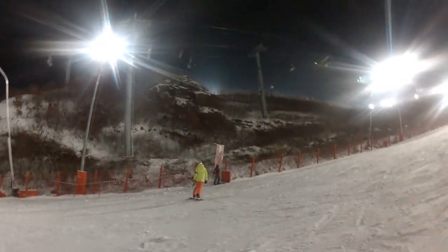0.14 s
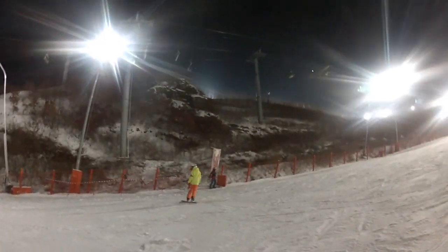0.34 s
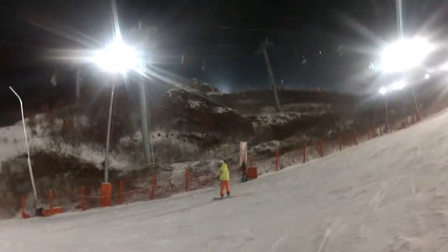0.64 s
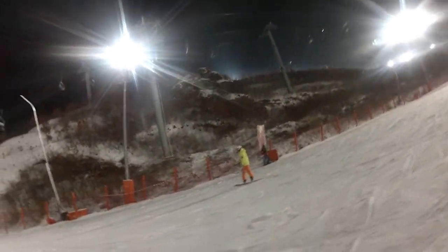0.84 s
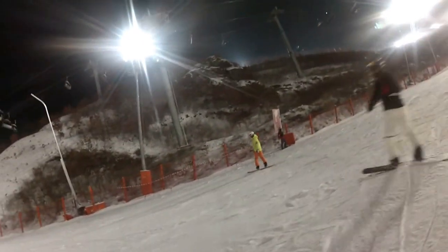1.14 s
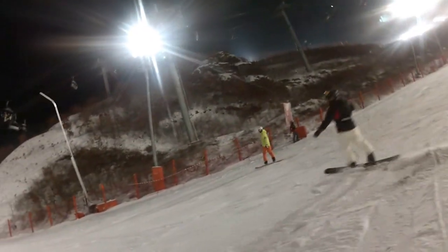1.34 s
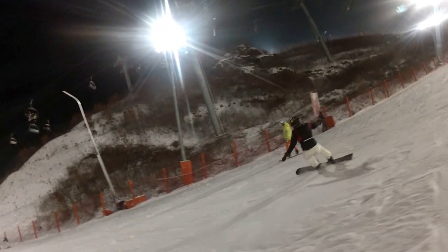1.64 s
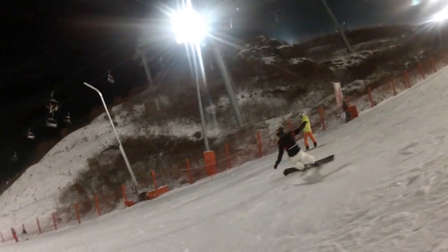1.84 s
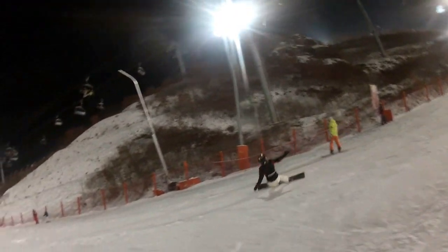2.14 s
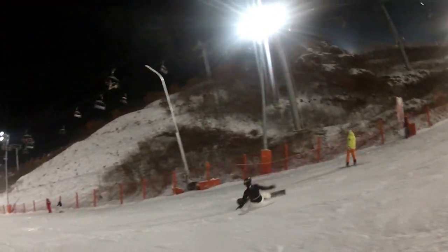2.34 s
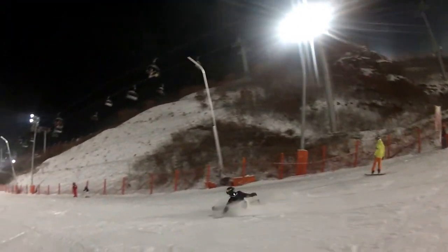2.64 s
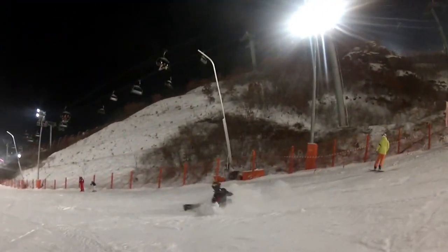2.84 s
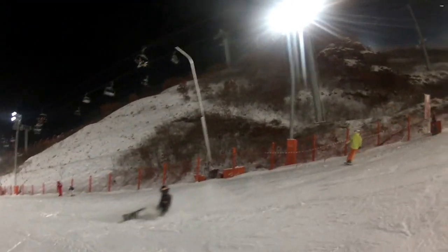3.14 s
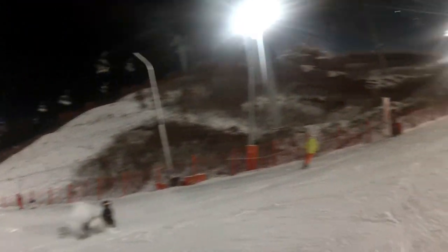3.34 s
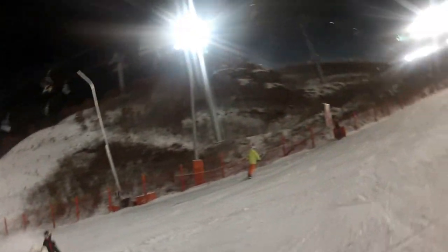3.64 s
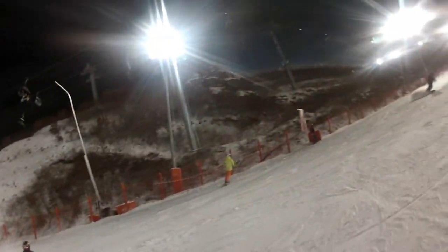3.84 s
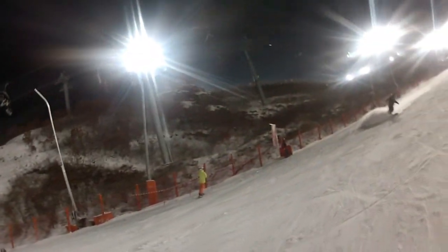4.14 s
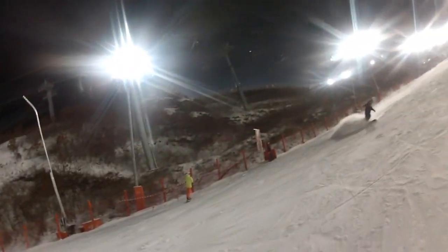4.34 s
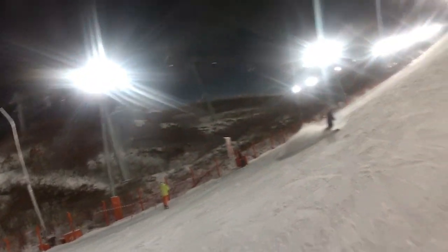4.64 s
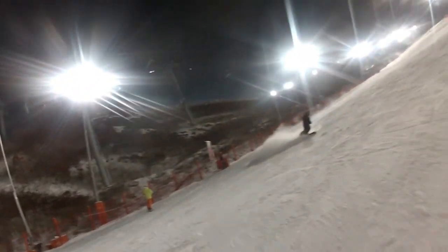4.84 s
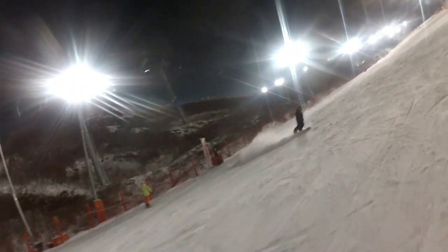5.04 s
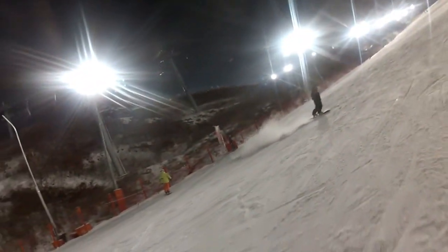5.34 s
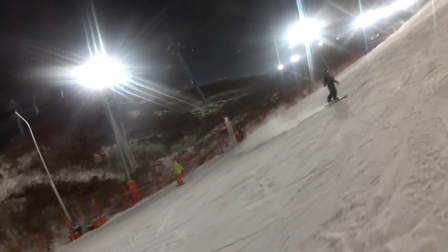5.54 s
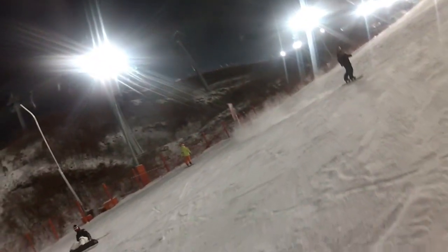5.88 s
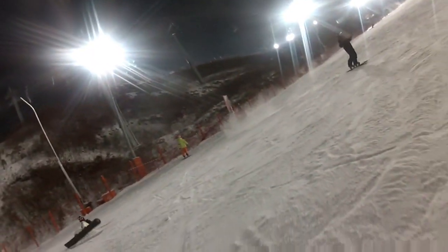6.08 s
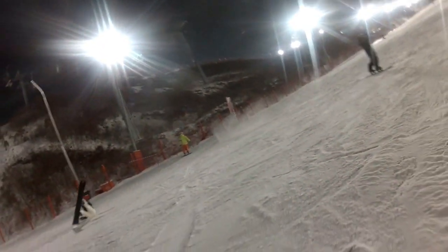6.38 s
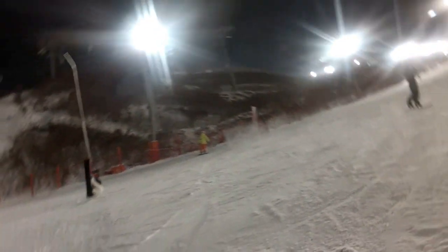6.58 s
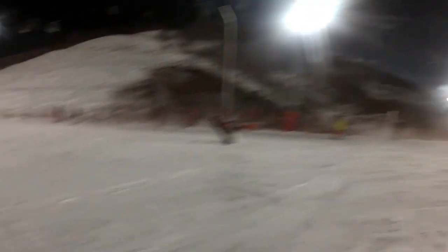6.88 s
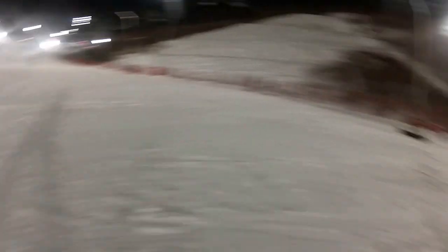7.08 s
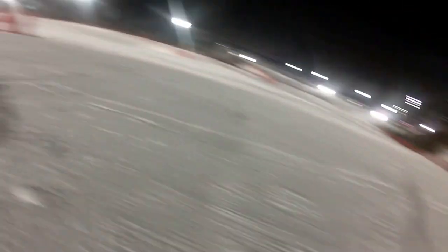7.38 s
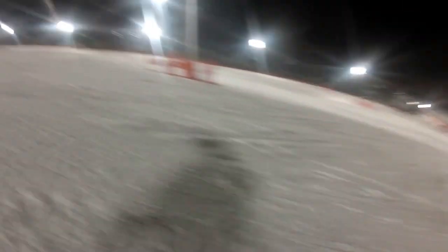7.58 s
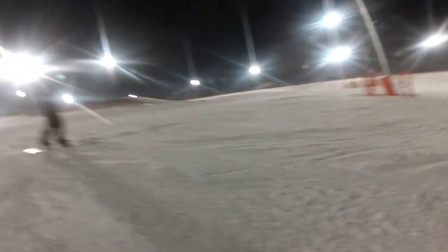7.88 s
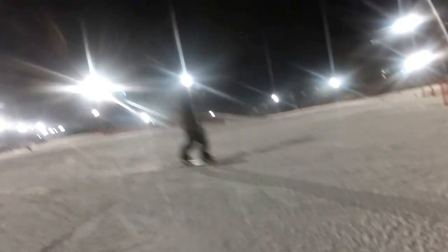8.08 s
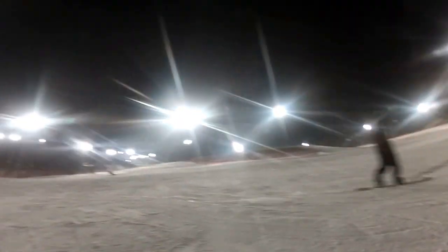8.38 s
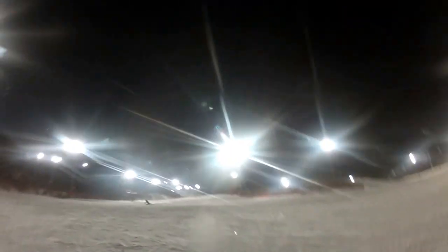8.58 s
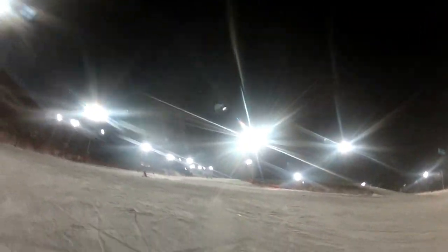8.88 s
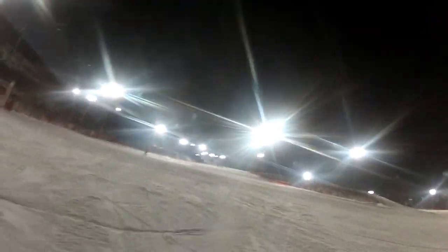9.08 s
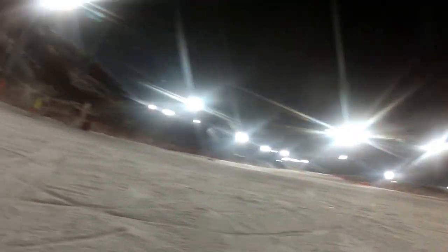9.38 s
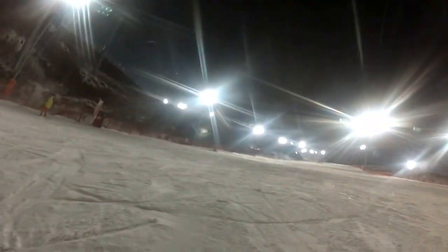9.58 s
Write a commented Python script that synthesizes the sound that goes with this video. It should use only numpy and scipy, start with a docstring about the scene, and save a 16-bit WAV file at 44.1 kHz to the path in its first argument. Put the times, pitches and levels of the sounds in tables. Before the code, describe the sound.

A snowboard scrapes over packed snow in swelling turns, with ice ticks and low wind rumble, until loud knocks hit the microphone.

```python
"""Night snowboard ride

A snowboarder rides a groomed slope, camera in hand, while others carve past. Steel edges crush the
snow in swelling turns, ice crumbs tick and the board drones; wind rumbles on the microphone and
floodlights hum faintly. Near the end the camera is swung round and knocked, and the board skids on
through crust. Everything has the coarse, fizzy top of an 8 kHz recorder."""
import sys
import numpy as np
from scipy import signal
from scipy.fft import rfft, irfft
from scipy.io import wavfile
from scipy.ndimage import uniform_filter1d

SR = 44100
rng = np.random.default_rng(int(sys.argv[2]) if len(sys.argv) > 2 else 0)


def wav_out(sig):
    """Save sig, one row per channel (or a flat mono array), as 16-bit PCM at SR to the path in sys.argv[1]."""
    wavfile.write(sys.argv[1], SR, np.round(np.clip(np.atleast_2d(sig).T, -1, 1) * 32767).astype(np.int16))


N = 428632
TIME = np.arange(N) / SR


# carved turns: (edge set [s], edge released [s], swell [s], fade [s],
#                scrape [dB], crunch [dB], spray [dB], board drone [dB], falling snow [dB])
TURNS = [(1.667, 1.87, 0.64, 0.16, -42, -49, -49.5, -59.5, -59),
         (2.59, 2.939, 0.59, 0.14, -42, -54, -48.5, -58, -78),
         (3.685, 3.915, 0.18, 0.13, -33, -46, -42.5, -58.5, -50.5),
         (6.165, 6.227, 0.018, 0.15, -47, -57, -48, -65, -64),
         (7.138, 7.72, 0.23, 0.23, -40.5, -50, -69, -65, -73)]
# brief bites into harder snow: (start [s], end [s], level [dB])
BITES = [(2.46, 2.483, -45), (2.614, 2.644, -34.5), (3.274, 3.335, -45), (3.5, 3.545, -36),
         (3.77, 3.8, -34), (3.904, 3.915, -34), (7.657, 7.693, -38)]
# sideways slides throwing powder: (start [s], end [s], swell [s], fade [s], scrape [dB], spray [dB])
PLUMES = [(.95, 1.4, 0.71, .3, -64, -55), (3.29, 3.6, 0.26, .2, -50, -48.5),
          (4.29, 4.708, 0.4, 0.75, -49, -50.5), (5.3, 5.895, .35, 1, -50, -48),
          (7.396, 7.72, 0.24, 0.19, -60, -45)]
# bright rasp of the edge: (frequency [Hz], level [dB])
SCRAPE_EQ = [(1200, -49.5), (1600, -14), (1850, 1.5), (2050, 4), (2250, 5.5), (2450, 1.5), (2700, -0.5),
             (2900, -13), (3200, -59.5)]
# lower body of a deep cut: (frequency [Hz], level [dB])
CRUNCH_EQ = [(250, -16), (450, -14), (750, -16.5), (1050, -20.5), (1250, -3.5), (1420, 4.5), (1600, -3),
             (1800, -26.5), (2300, -23)]
# thin sizzle of powder: (frequency [Hz], level [dB])
SPRAY_EQ = [(2600, -26.5), (2950, -18.5), (3150, 1.5), (3350, 2), (3550, 2), (3750, -8.5), (4000, -12.5)]
GLIDE_SCRAPE_DB, GLIDE_CRUNCH_DB, GLIDE_SPRAY_DB = -51, -68.5, -56   # running flat between turns
GLIDE_GRIT, GRIT_PER_DB = 0.23, 0.019   # share of coarse grains, growing with the load on the edge

def carve():
    """The edge scrapes, grittier under load; a deep cut adds crunch, and thrown snow a fine spray."""
    *_, scrape_db, crunch_db, spray_db, _, _ = np.transpose(TURNS)
    bites = [from_db(db) * stroke(start, end, swell_s=0.01, fade_s=0.0068) for start, end, db in BITES]
    edge = power_sum([turn_swells(GLIDE_SCRAPE_DB, scrape_db), *bites])
    slide = power_sum(from_db(db) * stroke(*timing) for *timing, db, _ in PLUMES)
    powder = power_sum(from_db(db) * stroke(*timing) for *timing, _, db in PLUMES)
    load_db = 20 * np.log10(edge) - GLIDE_SCRAPE_DB
    grit = GLIDE_GRIT + GRIT_PER_DB * load_db
    snow = friction(grit, per_s=1200, spread_db=0.6, chatter_db=1.5, chatter_rate=70)
    snow *= from_db(0.74 * drift(per_s=10))   # uneven snow
    scrape = power_sum([edge, slide]) * colour(snow, SCRAPE_EQ)
    depth = power_sum([turn_swells(GLIDE_CRUNCH_DB, crunch_db), from_db(-10) * slide])
    crunch = depth * colour(snow, CRUNCH_EQ)
    spray = power_sum([turn_swells(GLIDE_SPRAY_DB, spray_db), powder]) * colour(snow, SPRAY_EQ)
    return scrape + crunch + spray


# crumbs breaking: (time [s], peak [dB])
CRUMBS = [(2.463, -23), (2.626, -22.5), (3.505, -29), (3.645, -18.5), (3.769, -24), (4.2, -26), (6.16, -28),
          (6.709, -33.5), (7.159, -25), (7.185, -23.5), (7.526, -19.5)]
# brittle snap of ice: (frequency [Hz], level [dB])
CRUMB_EQ = [(1100, -20), (1400, -7.5), (1650, -10), (2000, -2), (2450, -0.5), (2950, -21.5), (3350, 0),
            (3900, -19)]

def ice_crumbs():
    """Ice crumbs snap and splinter under a carving edge."""
    return fractures(CRUMBS, CRUMB_EQ, splinter=0.24, t60=0.029)


# the closing skid: (start [s], end [s], swell [s], fade [s])
SKID = (8.88, 9.28, 0.53, 0.13)
# dry crackle of crust: (frequency [Hz], level [dB])
CRUST_EQ = [(500, -38), (1000, -21), (1400, -4), (1650, -7), (1880, 3.5), (2200, -0.5), (2500, -5.5),
            (2950, -17), (3300, -11.5), (3600, -13), (4000, -17)]

def crust_skid(glide_db=-49.5, skid_db=-41.5):
    """The board slides sideways through crackling crust, swelling once."""
    level = power_sum([from_db(glide_db), from_db(skid_db) * stroke(*SKID)])
    crackle = friction(grit=0.5, per_s=400, spread_db=2.0, chatter_db=2.0, chatter_rate=90)
    return level * colour(crackle, CRUST_EQ)


# crust cracking: (time [s], peak [dB])
TICKS = [(8.829, -24.5), (8.865, -20.5), (8.983, -24), (9.006, -31), (9.038, -24), (9.06, -27),
         (9.115, -26), (9.2045, -24.5), (9.253, -25), (9.278, -23), (9.3125, -12.5), (9.6895, -21),
         (9.698, -21.5)]
# hard, narrow tick: (frequency [Hz], level [dB])
TICK_EQ = [(900, -29), (1400, -8), (1700, -1.5), (1870, 7), (2100, 1), (2400, 1), (2950, -51), (3400, -26),
           (3900, -35)]

def crust_ticks():
    """Bits of crust break in short, sharp ticks."""
    return fractures(TICKS, TICK_EQ, splinter=0.15, t60=0.012)


# larger ridges: (time [s], dull slap [dB], gritty tap [dB])
BUMPS = [(.248, -36.5, -46), (0.296, -54, -61), (2.974, -43, -41), (3.3, -57, -42), (3.985, -62, -32.5),
         (4.968, -52, -40), (7.122, -34, -54), (7.44, -32, -42), (8.02, -56, -35)]
# low drumming of the board: (frequency [Hz], level [dB])
DRONE_EQ = [(70, -27), (130, -2), (200, -1.5), (290, 1), (420, -5.5), (600, -8), (900, -11.5), (1300, -12),
            (2000, -42)]

def board(glide_db=-60):
    """Ridged snow drums on the board, harder just after the edge sets; larger ridges slap it."""
    *_, drone_db, _ = np.transpose(TURNS)
    ridges = friction(grit=0.64, per_s=390, spread_db=3.0, chatter_db=0.5, chatter_rate=59)
    drone = turn_swells(glide_db, drone_db, lag_s=0.04) * colour(ridges, DRONE_EQ)
    times, slap_db, tap_db = np.transpose(BUMPS)
    slaps = ring(clicks_at(times, slap_db), hz=250, t60=0.043)
    tap_eq = [(300, -1.0), (900, 1), (1500, 8), (2300, -7.5)]   # (frequency [Hz], level [dB])
    taps = fractures(zip(times, tap_db), tap_eq, splinter=0.17, t60=0.032)
    return drone + slaps + taps


# hits on the camera: (time [s], thump [dB], crack [dB])
KNOCKS = [(0.124, -35.5, -31), (0.246, -24, -34), (8.183, 3, -3), (8.187, -42, -18), (8.195, -7, -6),
          (8.205, -15, -22), (8.21, -44, -18), (8.399, -11.5, -16.5), (8.427, -17, -23), (8.464, -31, -27),
          (8.519, -30, -32)]
# hollow clack of the plastic case: (frequency [Hz], level [dB])
CASE_EQ = [(100, 6.5), (300, 6), (390, -4), (520, -23), (630, -7), (740, 0.5), (930, -24), (1280, 1.5),
           (1550, -6), (1870, 9), (2200, -3.5), (2500, -2), (3000, -21.5), (3600, -13)]

def camera_knocks(rest_hz=33, extra_hz=82, glide_s=0.01255, rise_s=0.0032, t60=0.31):
    """A knock cracks in the case; its thump passes the microphone highs first, so the pitch sinks."""
    times, thump_db, crack_db = np.transpose(KNOCKS)
    age = TIME[:SR // 2]
    cycles = rest_hz * age + extra_hz * glide_s * (1 - np.exp(-age / glide_s))
    envelope = (1 - np.exp(-age / rise_s)) * from_db(-60 * age / t60)
    thump = -np.sin(2 * np.pi * cycles) * envelope
    thumps = signal.oaconvolve(clicks_at(times, thump_db), thump)[:N]
    return thumps + fractures(zip(times, crack_db), CASE_EQ, splinter=0.7, t60=0.023)


# glove strokes: (start [s], end [s], level [dB])
RUBS = [(8.216, 8.297, -46.5), (8.373, 8.404, -37), (8.583, 8.93, -48), (9.61, 9.72, -46.5)]
# nasal scuff of glove on plastic: (frequency [Hz], level [dB])
RUB_EQ = [(500, -14.5), (670, -26.5), (770, -2), (900, -38), (1020, -14), (1200, -5.5), (1350, 1.5),
          (1550, -17), (1900, -10), (2600, -25)]

def glove_rubs(rumble_db=-7.5):
    """The glove drags over the case, with a handling rumble tucked under the scuff."""
    level = power_sum(from_db(db) * stroke(*span, swell_s=0.029, fade_s=0.046) for *span, db in RUBS)
    drag = friction(grit=0.3, per_s=700, spread_db=2.5, chatter_db=2.5, chatter_rate=60)
    return level * (colour(drag, RUB_EQ) + from_db(rumble_db) * colour(drag, DRONE_EQ))


# glove squeaks: (start [s], end [s], pitch [Hz], level [dB])
RASPS = [(8.514, 8.556, 1580, -37.5), (8.714, 8.76, 1360, -41.5)]

def glove_rasp(start, end, hz, level_db):
    """The glove sticks and slips on the case in one short rasp."""
    slips = ring(grains(per_s=700, spread_db=1.5), hz, t60=0.005)
    return from_db(level_db) * stroke(start, end, swell_s=0.003, fade_s=0.0078) * colour(slips, TICK_EQ)


# gusts: (time [s], half width [s], level [dB])
GUSTS = [(.36, 0.24, -34), (.93, 0.26, -36.5), (1.5, 0.16, -35), (3.0, 0.84, -46), (4.6, 0.069, -35),
         (4.97, 0.21, -37.5), (5.45, 0.064, -32), (6.1, 0.71, -39), (6.86, .16, -30), (7.191, 0.064, -28.5),
         (8.7, 0.2, -35)]
# sub-bass buffeting: (frequency [Hz], level [dB])
EDDY_EQ = [(15, -14.5), (24, -8.5), (32, 4), (41, -4), (52, -9.5), (68, -11), (90, -20), (120, -38.5),
           (200, -45)]

def wind(breeze_db=-42, slow_hz=48):
    """Eddies buffet the microphone in the deep bass; stronger gusts reach higher in pitch."""
    gusts = [from_db(db) * np.exp(-((TIME - time) / width) ** 2 / 2) for time, width, db in GUSTS]
    gust_db = 20 * np.log10(power_sum([from_db(breeze_db), *gusts]))
    eddies = colour(rng.standard_normal(N), EDDY_EQ)
    lowpass = signal.butter(2, slow_hz, fs=SR, output="sos")
    slow_eddies = rms_one(signal.sosfilt(lowpass, colour(rng.standard_normal(N), EDDY_EQ)))
    strength = np.clip((gust_db + 48.5) / 16, 0.06, 0.6)
    buffet = np.sqrt(strength) * eddies + np.sqrt(1 - strength) * slow_eddies
    return from_db(gust_db + 2.5 * drift(per_s=15)) * level_out(buffet, seconds=0.138)


# muffled patter of snow: (frequency [Hz], level [dB])
PATTER_EQ = [(250, -13), (420, 5.5), (780, 3.5), (1100, -7), (1500, -10)]

def falling_snow(hold_s=0.04):
    """Snow thrown up by each turn patters down, most thickly as the edge is released."""
    showers = [from_db(db) * stroke(end - hold_s, end + hold_s, swell_s=0.14, fade_s=0.11)
               for _, end, *_, db in TURNS]
    return power_sum(showers) * colour(grains(per_s=2500, spread_db=1.5), PATTER_EQ)


# hum partials: (frequency [Hz], level [dB])
HUM = [(120, -67.5), (180, -70)]

def floodlights():
    """The lamps' ballasts hum faintly."""
    return sum(from_db(db) * np.sqrt(2) * np.sin(2 * np.pi * hz * TIME) for hz, db in HUM)


def turn_swells(glide_db, levels_db, lag_s=0):
    """Envelope of a steady glide with a swell for each turn."""
    swells = [from_db(db) * stroke(start + lag_s, end + lag_s, swell_s, fade_s)
              for (start, end, swell_s, fade_s, *_), db in zip(TURNS, levels_db)]
    return power_sum([from_db(glide_db), *swells])


def stroke(start, end, swell_s, fade_s):
    """Pressure builds up, holds at 1 from start to end and dies away."""
    return np.exp(-np.maximum(start - TIME, 0) / swell_s - np.maximum(TIME - end, 0) / fade_s)


def friction(grit, per_s, spread_db, chatter_db, chatter_rate):
    """Smooth hiss blended with coarse grains, fluttering as the surfaces grip and slip."""
    share = np.clip(grit, 0, 1)
    texture = np.sqrt(1 - share) * rng.standard_normal(N) + np.sqrt(share) * grains(per_s, spread_db)
    return texture * from_db(chatter_db * np.sqrt(share) * drift(chatter_rate))


def grains(per_s, spread_db):
    """Tiny snaps at random moments, a few louder than the rest; rms 1."""
    sizes = from_db(spread_db * np.minimum(rng.exponential(1, N), 3.5)) * rng.choice([-1, 1], N)
    return rms_one(sizes * (rng.random(N) < per_s / SR))


def fractures(events, eq, splinter, t60):
    """Each event is one snap with a short splintering tail, ringing in a body."""
    body, track = response(eq), np.zeros(N + SR)
    age = TIME[:SR // 20]
    for time, peak_db in events:
        force = (age == 0) + splinter * rng.standard_normal(len(age)) * from_db(-60 * age / t60)
        snap = signal.fftconvolve(force, body)
        track[int(time * SR):][:len(snap)] += from_db(peak_db) * snap / np.abs(snap).max()
    return track[:N]


def clicks_at(times, levels_db):
    """One click for each event."""
    return np.bincount((np.asarray(times) * SR).astype(int), from_db(levels_db), N)[:N]


def ring(clicks, hz, t60):
    """A unit click sets a sine of height 1 ringing."""
    decay, angle = from_db(-60 / (t60 * SR)), 2 * np.pi * hz / SR
    return signal.lfilter([0, np.sin(angle)], [1, -2 * decay * np.cos(angle), decay ** 2], clicks + 1e-18)


def colour(x, eq):
    """Play a signal through a body with this EQ curve; rms 1."""
    return rms_one(signal.oaconvolve(x, response(eq))[:N])


def response(eq, size=8192):
    """Minimum-phase impulse response of an EQ curve, rolling off beyond its ends."""
    hz, db = np.transpose(eq)
    log_hz = np.log(np.maximum(np.arange(size // 2 + 1) * SR / size, 1))
    outside = np.abs(log_hz - np.clip(log_hz, np.log(hz[0]), np.log(hz[-1])))
    curve_db = np.interp(log_hz, np.log(hz), db) - 30 * outside
    cepstrum = irfft(np.log(from_db(curve_db)))
    causal_fold = 1 + np.sign(size // 2 - np.arange(size)) * (np.arange(size) > 0)
    return irfft(np.exp(rfft(cepstrum * causal_fold)))


def drift(per_s):
    """Random modulation gliding to per_s new values a second; rms 1."""
    knots = rng.standard_normal(N // 20)
    return rms_one(np.interp(TIME * per_s, np.arange(len(knots)), knots))


def level_out(x, seconds):
    """Ride the gain to take the slow swells out of a noise."""
    return x / np.sqrt(uniform_filter1d(x ** 2, int(seconds * SR)) + 1e-6)


def power_sum(gains):
    """Unrelated sounds add in power."""
    return np.sqrt(sum(gain ** 2 for gain in gains))


def rms_one(x):
    """Scale to rms 1."""
    return x / np.sqrt(np.mean(x ** 2) + 1e-20)


def from_db(db):
    """Decibels to gain."""
    return 10 ** (np.asarray(db) / 20)


def scene():
    """Mono mix: the skid and the rubbing glove join the carving as the camera is swung round."""
    swung = np.clip((TIME - 8.18) / 0.022, 0, 1)
    ice = ice_crumbs() + crust_ticks()
    handling = camera_knocks() + sum(glove_rasp(*rasp) for rasp in RASPS)
    ride = carve() + swung * (crust_skid() + glove_rubs()) + board()
    return (ride + ice + handling + wind() + falling_snow() + floodlights())[None]


def record(dry, rate_hz=8000, hold=6, band_hz=3900, top_hz=14900):
    """Lo-fi chain: a low sample rate, clipping, and a sample hold that mirrors sound into the treble."""
    narrow = signal.sosfilt(signal.butter(10, band_hz, fs=SR, output="sos"), dry)
    coarse = np.clip(signal.resample_poly(narrow, rate_hz, SR, axis=1), -1, 1)
    steps = np.repeat(coarse, hold, axis=1)
    held = signal.resample_poly(steps, SR, rate_hz * hold, axis=1)[:, :N]
    return signal.sosfilt(signal.ellip(10, 0.2, 80, top_hz, fs=SR, output="sos"), held)


dry = scene()
out = record(dry)
wav_out(out)
```